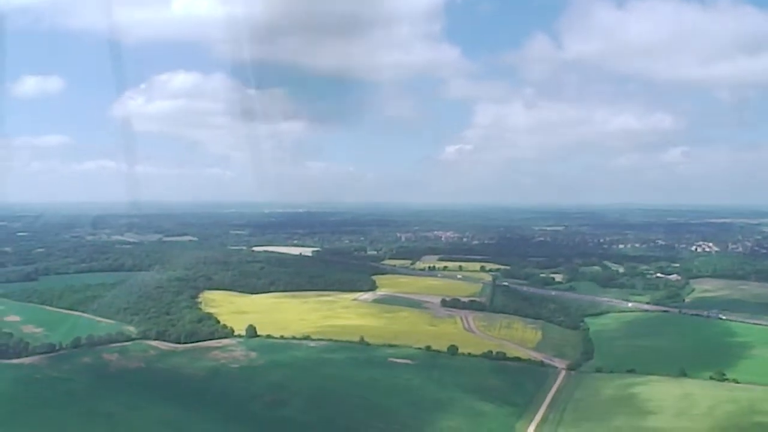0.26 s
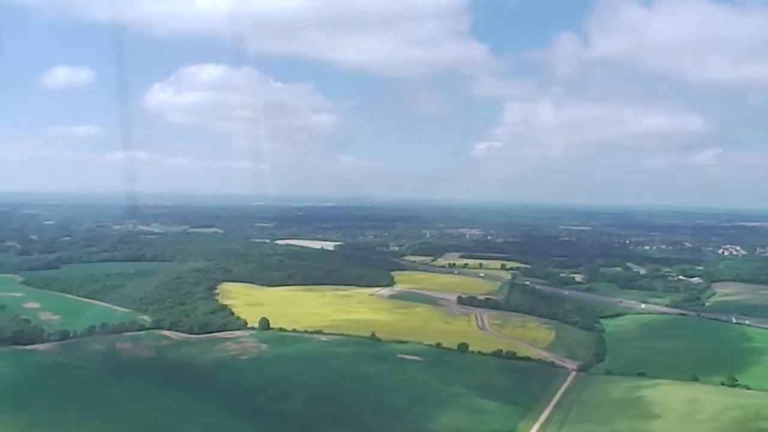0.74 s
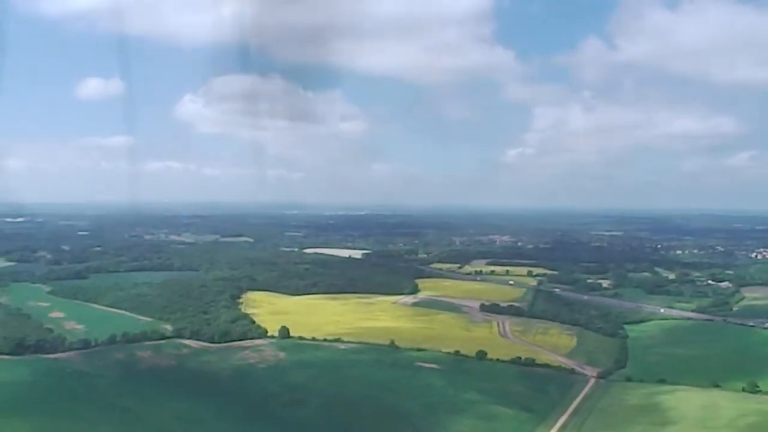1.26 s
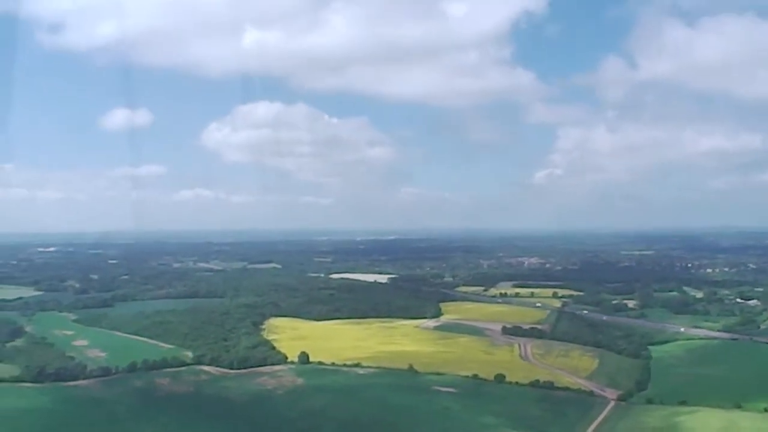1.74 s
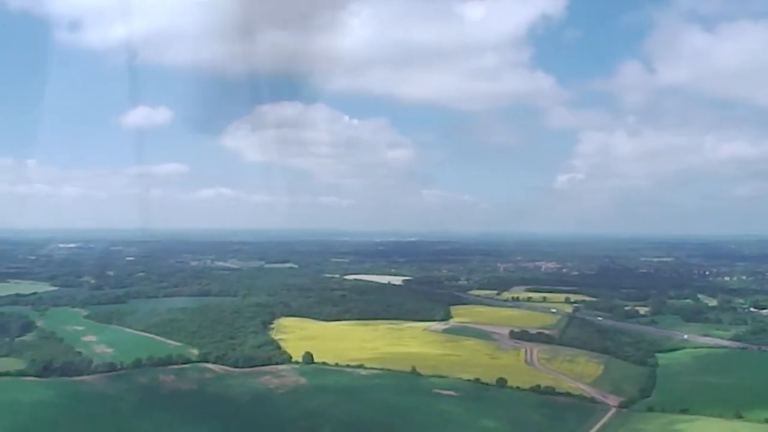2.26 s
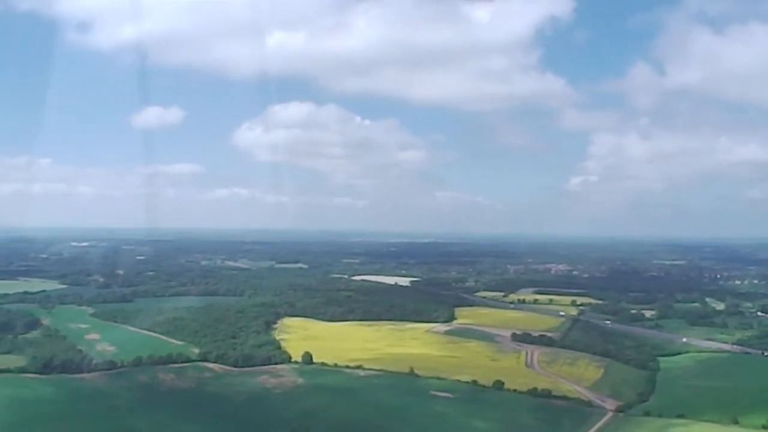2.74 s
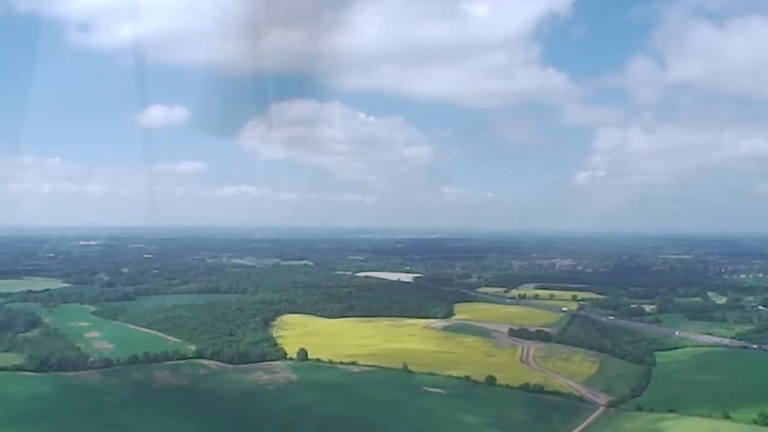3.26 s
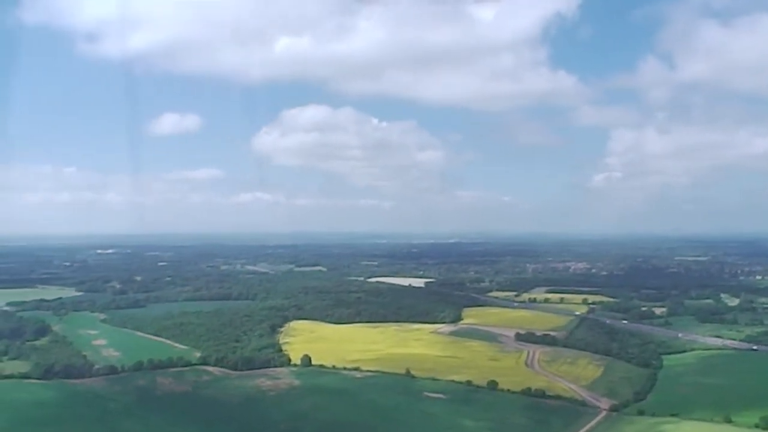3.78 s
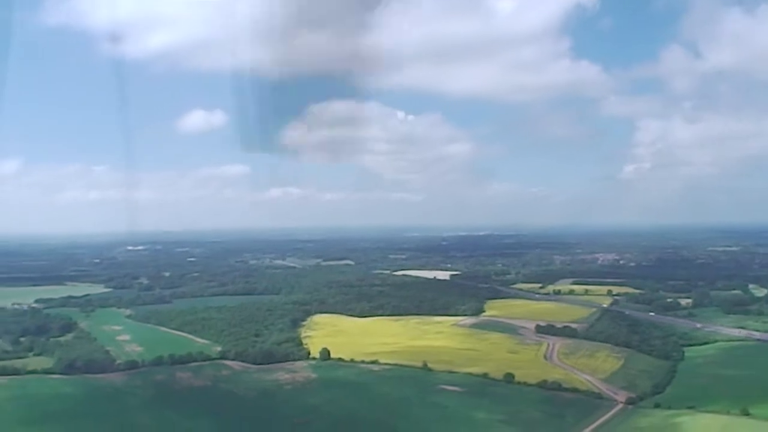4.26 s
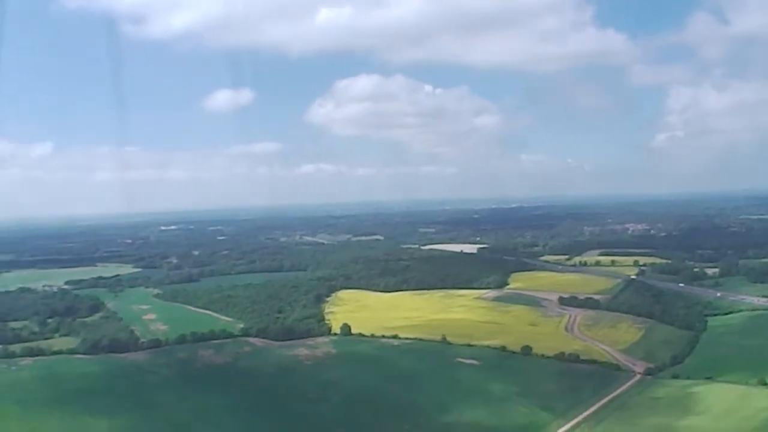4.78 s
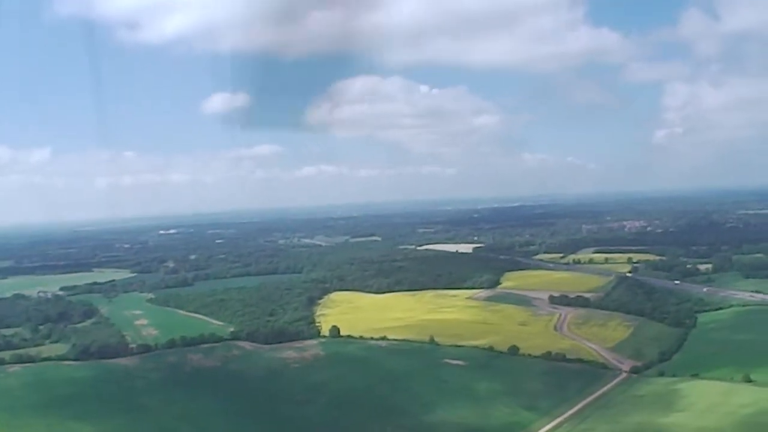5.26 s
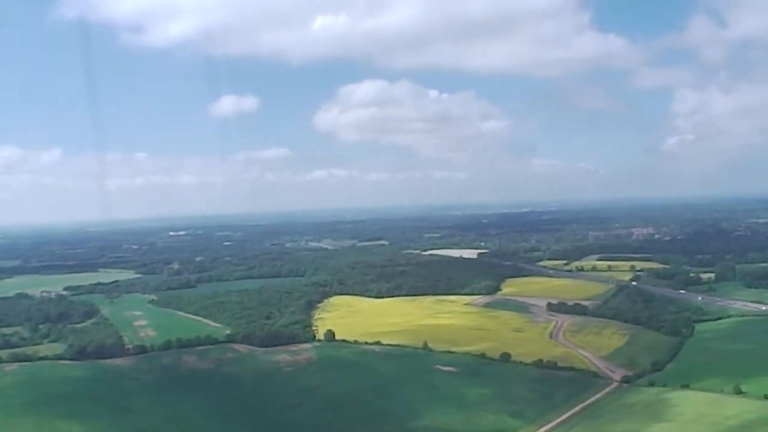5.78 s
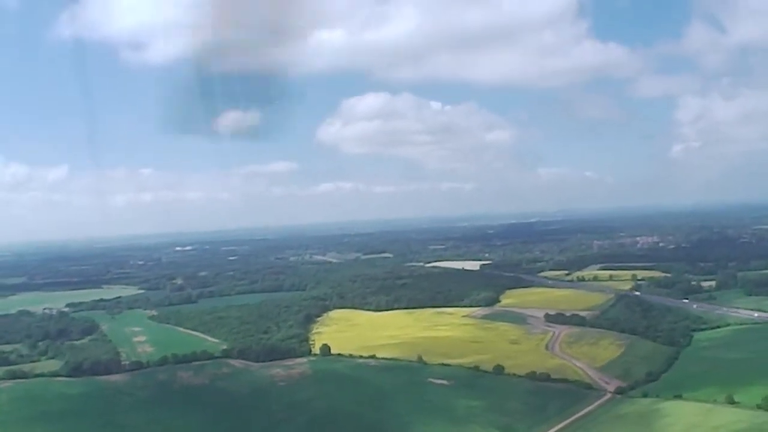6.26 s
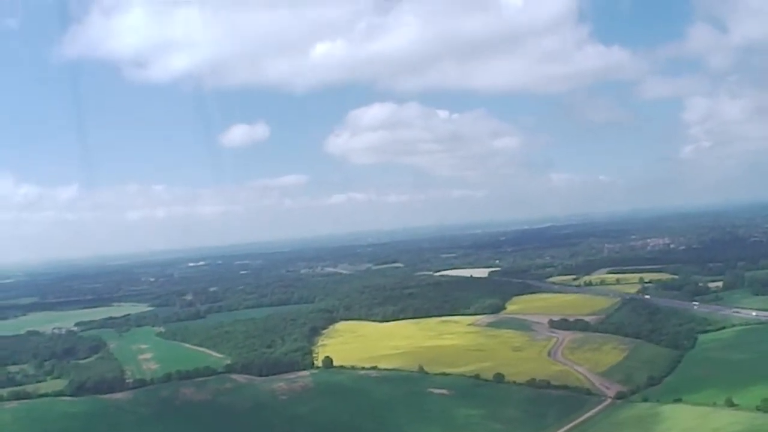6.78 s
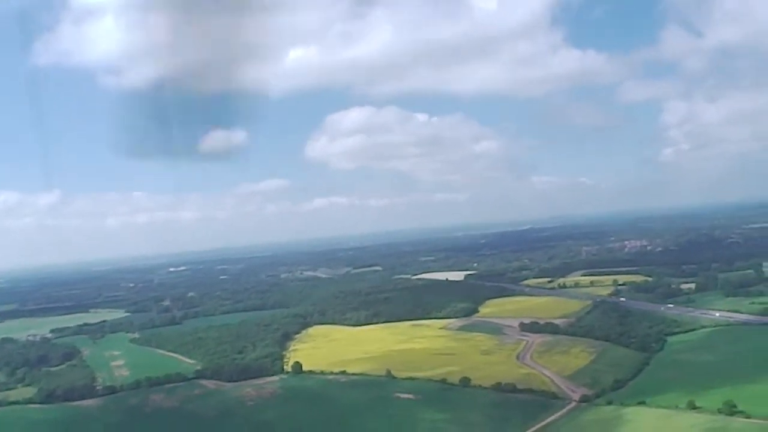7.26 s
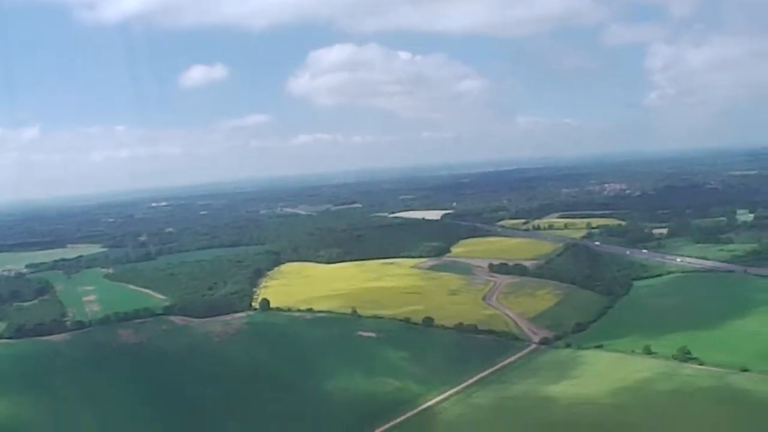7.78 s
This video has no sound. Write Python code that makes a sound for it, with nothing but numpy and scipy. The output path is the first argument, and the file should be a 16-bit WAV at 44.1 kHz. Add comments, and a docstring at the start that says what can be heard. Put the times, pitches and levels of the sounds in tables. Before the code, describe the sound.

Inside a turbine helicopter cabin flying level over farmland, a dense loud drone fills everything from start to end. Bass-heavy air and engine roar mixes with low rotor and tail rotor hum, a steady gear whine near 1.9 kHz and a very high blurred compressor whistle. The close cabin microphone seems overloaded: the overall volume repeatedly drops suddenly and swells back within a fraction of a second.

```python
"""Turbine helicopter cabin in cruise

Main rotor, tail rotor and gearbox are sine lines locked to one gear-mesh pitch.
Air and engine roar is shaped noise; the compressor is a blurred whistle near 13.5 kHz; one faint chirp slides down.
The whole level keeps dropping suddenly and creeping back; a limiter holds the peaks.
"""
import sys
import numpy as np
from scipy import signal
from scipy.fft import rfft, irfft
from scipy.io import wavfile
from scipy.ndimage import uniform_filter1d, minimum_filter1d

SR = 44100
rng = np.random.default_rng(int(sys.argv[2]) if len(sys.argv) > 2 else 0)


def dump_mix(stems):
    """Bounce the given channels to the path in sys.argv[1] as a 16-bit WAV at rate SR."""
    frames = np.atleast_2d(stems).T  # one column per channel
    limited = np.clip(frames, -1, 1)  # hard clip at full scale
    pcm = np.round(limited * 32767).astype(np.int16)
    wavfile.write(sys.argv[1], SR, pcm)


N = 354123
T = np.arange(N) / SR

# All source levels are ahead of level(), which moves them together.
# drive train: t/s, input gear mesh f/Hz, mesh whine level/dB, compressor whistle level/dB
DRIVE = [(0, 1883.2, -35, -54), (.9, 1882.5, -30.5, -55), (1.6, 1881.2, -32, -56),
         (2.4, 1881.2, -30.5, -50.5), (3.2, 1878.9, -29, -53), (4, 1876.1, -28.5, -51),
         (4.6, 1878.4, -31.5, -47), (5.3, 1883.2, -37.5, -48), (5.9, 1883.8, -35.5, -56),
         (6.5, 1880.7, -28.5, -54), (7.2, 1878.8, -28.5, -57), (8.03, 1880.1, -31, -46)]


def undb(db):
    """dB to amplitude gain."""
    return 10 ** (np.asarray(db) / 20)


def curves(table):
    """Columns of a time table, linearly interpolated to one value per sample."""
    t_s, *columns = np.transpose(table)
    return [np.interp(T, t_s, column) for column in columns]


def walk(rate_hz):
    """Random levels held 1 / rate_hz and slewed twice; spread near 1."""
    hold = int(SR / rate_hz)
    steps = np.repeat(rng.standard_normal(N // hold + 1), hold)
    slewed = uniform_filter1d(uniform_filter1d(steps, hold), hold)
    return 1.21 * slewed[:N]


def tone(cycles, db, pan_db, waver_db, slip_rad, lead_rad=0.):
    """Stereo sine near rms level db with wandering size and phase; the left phase may lead."""
    phase = 2 * np.pi * (cycles + rng.random()) + slip_rad * walk(5)
    size = np.sqrt(2) * undb(db + waver_db * walk(4.04))
    left = undb(pan_db / 2) * np.sin(phase + lead_rad)
    right = undb(-pan_db / 2) * np.sin(phase)
    return size * np.array([left, right])


def roar():
    """Air and engine noise coloured by the cabin; alike on both sides in the bass, nearly unrelated in the top."""
    # cabin colour: f/Hz, relative density/dB per Hz
    colour = np.array([(12, -24), (32, -10), (60, -12), (100, -1.5), (210, -2), (300, -6.5), (450, -10.5),
                       (800, -19), (1200, -19.5), (1400, -25.5), (2000, -28), (2750, -37), (3700, -32.5),
                       (7000, -45.5), (12000, -49), (15500, -55)])
    # ringing panels and ducts: f/Hz, width/Hz, gain over the roar/dB
    panels = [(100, 10, 2), (206, 19, 2), (629, 79, 4), (1226, 46, 2.5), (1292, 24, 4), (1477, 26, 5),
              (1875, 49, 10), (2320, 170, 2), (3340, 110, 3), (3900, 78, 2), (4720, 150, 1.5),
              (13500, 320, 17.5)]
    # stereo pair: f/Hz, likeness/0-1, left minus right/dB
    pair = np.array([(60, 0.98, -2.5), (250, 1, -1.5), (700, 0.9, -2), (1280, 0.91, -0.5),
                     (2400, 0.63, -1.5), (4400, 0.63, 1), (8000, 0.5, 0.2), (14000, .1, 1.5)])
    roar_rms_db, buffet_db = -13.5, 1

    hz = np.maximum(np.arange(N // 2 + 1) * SR / N, 1)
    log_hz = np.log(hz)
    shape = undb(np.interp(log_hz, np.log(colour[:, 0]), colour[:, 1]))
    for centre_hz, width_hz, db in panels:
        detune = 2 * (hz - centre_hz) / width_hz
        shape *= np.sqrt(1 + (undb(2 * db) - 1) / (1 + detune ** 2))

    pair_log_hz = np.log(pair[:, 0])
    like = np.clip(np.interp(log_hz, pair_log_hz, pair[:, 1]), 0, 1)
    pan_db = np.interp(log_hz, pair_log_hz, pair[:, 2])
    noise = rfft(rng.standard_normal((2, N))) * shape
    mid, side = noise * np.sqrt([1 + like, 1 - like])
    both = np.array([(mid + side) * undb(pan_db / 2), (mid - side) * undb(-pan_db / 2)])

    # slow heave of the deepest rumble
    deep = 1 / (1 + (hz / 130) ** 4)
    out = undb(buffet_db * walk(1.49)) * irfft(both * deep, N)

    # gusts round the doors: octave bands flutter partly together, partly alone; the lowest band barely moves
    both *= 1 - deep
    octave = np.clip(np.log2(hz / 700), 0, 4)
    gust = 0.98 * walk(7)
    for k, flutter_db in enumerate([0.11, 1.0, 0.99, 1.0, 0.7]):
        band = np.maximum(1 - abs(octave - k), 0)
        out = out + undb(flutter_db * (walk(13) + gust)) * irfft(both * band, N)
    return out * undb(roar_rms_db) / np.sqrt(np.mean(out ** 2))


def chirp():
    """One short faint sine that slides down, under a half-sine envelope."""
    # start t/s, length/s, from f/Hz, to f/Hz, level/dB
    start_s, length_s, from_hz, to_hz, db = (3.4, 0.25, 1702, 1672, -35)
    part = np.clip((T - start_s) / length_s, 0, 1)
    cycles = np.cumsum(from_hz + (to_hz - from_hz) * part) / SR
    return np.sin(np.pi * part) * tone(cycles, db, -2, waver_db=.6, slip_rad=.2)


def compressor():
    """Blade-passing whistle blurred by turbulent intake air; the governor spools it up while the drive runs slow."""
    start_hz, governed_mesh_hz = 13515, 1879.9
    spool_per_s = 17.5  # Hz/s gained per Hz of mesh below governed pitch
    mesh_hz, _, db = curves(DRIVE)
    hz = start_hz + spool_per_s * np.cumsum(governed_mesh_hz - mesh_hz) / SR
    cycles = np.cumsum(hz + 10 * walk(80)) / SR
    return tone(cycles, db + 3 * walk(45), 1.5, waver_db=2.0, slip_rad=.5, lead_rad=1.3)


def drive_train():
    """Rotors, shafts and mesh side lines turn in fixed ratio to the gear mesh, so their pitches move together."""
    # main rotor and its ring gear: multiple of rotor turn, level/dB, left minus right/dB
    rotor_lines = [(6, -30, -3), (8, -27, -2), (9, -38, -2), (12, -33, -2), (14, -35, -2), (18, -34, -2),
                   (24, -33, -2), (27, -36, -2), (75, -41, -2), (94, -38, -3), (96, -36, -3), (98, -32, -6),
                   (99, -37, -3), (100, -26, -4), (102, -39, -2), (104, -40, -3), (110, -47, -3),
                   (150, -42, -1), (196, -45, -4), (198, -35, -6), (200, -47, -5), (225, -43, -1)]
    # two-blade tail rotor: multiple of shaft turn, level/dB, left minus right/dB
    tail_lines = [(1, -33.5, -7), (2, -28, -3.5), (4, -20, -2.5), (6, -24.5, -1.5), (8, -24, -2),
                  (10, -31, -1.5), (12, -45.5, -2)]
    # other shafts and pumps: f/Hz at cruise, level/dB, left minus right/dB
    shaft_lines = [(98.9, -31, -3), (374.0, -35, -2), (395.9, -38, -2), (745.7, -43, -2), (749.4, -42, -2),
                   (1683, -50, -2), (4755, -61, 1), (6930, -65, 2)]
    # mesh side lines from uneven shafts: offset from mesh at cruise/Hz, level/dB, left minus right/dB
    side_lines = [(-98.6, -52, 0), (-50.2, -53, -2), (-25.6, -49, 0), (-20.2, -49, -1), (25.9, -46, -4),
                  (43.4, -44, -7), (70.5, -47, -2)]
    mesh_per_rotor_turn, mesh_per_tail_turn = 289.3, 44.7
    cruise_mesh_hz, gear_throb = 1879.5, .3

    mesh_hz, whine_db, _ = curves(DRIVE)
    mesh = np.cumsum(mesh_hz) / SR  # cycles
    rotor_turns = mesh / mesh_per_rotor_turn
    out = tone(mesh, whine_db, -4.5, waver_db=.8, slip_rad=.3, lead_rad=.7)
    for k, db, pan_db in rotor_lines:
        # the ring gear runs slightly out of round: its hum throbs once a turn
        throb = 1 + (90 < k < 120) * gear_throb * np.cos(2 * np.pi * rotor_turns)
        out += throb * tone(k * rotor_turns, db, pan_db, waver_db=.7, slip_rad=.15)
    for k, db, pan_db in tail_lines:
        out += tone(k * mesh / mesh_per_tail_turn, db, pan_db, waver_db=0.94, slip_rad=0.35)
    for hz, db, pan_db in shaft_lines:
        out += tone(hz * mesh / cruise_mesh_hz, db, pan_db, waver_db=2.5, slip_rad=min(hz / 600, 3))
    for hz, db, pan_db in side_lines:
        out += tone(mesh * (1 + hz / cruise_mesh_hz), db, pan_db, waver_db=1.0, slip_rad=0.6)
    return out


def level():
    """Gain with sudden drops that recover exponentially on a slow swell; random small drops are added."""
    # sudden drops: t/s, depth/dB
    deep_drops = [(0.01, 1.5), (0.414, 3), (0.731, 5), (0.94, 4), (1.302, 3.5), (1.658, 4), (1.946, 2),
                  (2.135, 3.5), (2.35, 4), (2.868, 3.5), (3.315, 3), (3.679, 1.5), (4.986, 2.5), (5.253, 4),
                  (5.602, 3), (5.772, 7), (6.293, 3), (6.448, 2), (6.834, 5.5), (7.401, 3), (7.555, 2)]
    # slow swell: t/s, level/dB ahead of a fixed 1.5 dB lift
    swell = [(0, -2), (.6, 2.5), (1.2, -1.5), (2, 2), (3.5, 0), (4.5, 0), (5.5, 1), (6.5, 0), (8.03, -0.5)]
    recover_s = .1  # time constant
    small_drops_per_s, small_drop_mean_db = 3, 1.8

    when, depth = rng.random((int(small_drops_per_s * N / SR), 2)).T
    small_drops = list(zip(when * N / SR, 2 * depth * small_drop_mean_db))
    drop_db = 0
    for start_s, depth_db in list(deep_drops) + small_drops:
        recovery = np.exp(-np.maximum(T - start_s, 0) / recover_s)
        drop_db = drop_db + depth_db * (T >= start_s) * recovery
    return undb(curves(swell)[0] + 1.5 - uniform_filter1d(drop_db, size=100))


def scene():
    """Sum of the sources under one common level."""
    return (roar() + chirp() + compressor() + drive_train()) * level()


def record(dry):
    """Limiter with 5 ms look-ahead, one gain for both sides, then a steep low-pass."""
    ceiling, top_hz = .99, 15680
    need = np.minimum(1, ceiling / (np.abs(dry).max(axis=0) + 1e-9))
    held = minimum_filter1d(need, size=441)
    gain = uniform_filter1d(uniform_filter1d(held, size=221), size=221)
    low_pass = signal.ellip(12, .2, 80, top_hz, fs=SR, output="sos")
    return signal.sosfilt(low_pass, dry * gain)


dry = scene()
out = record(dry)
dump_mix(out)
```